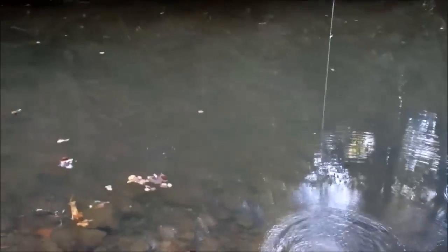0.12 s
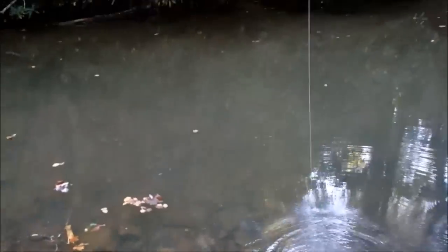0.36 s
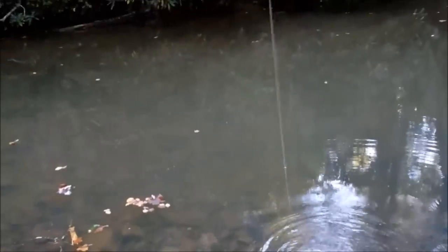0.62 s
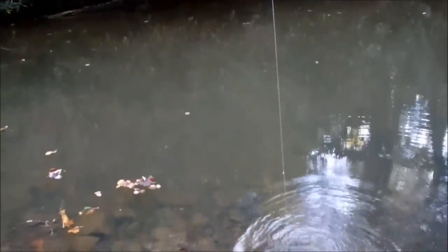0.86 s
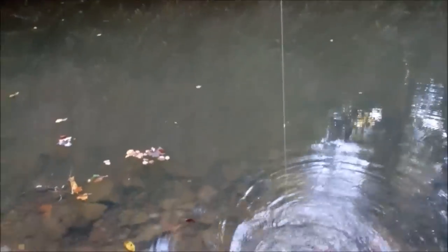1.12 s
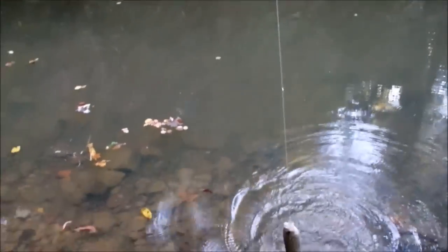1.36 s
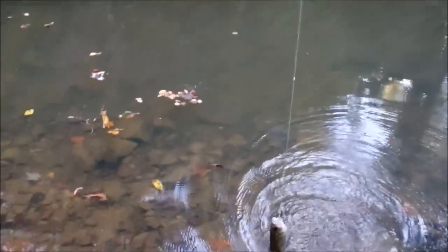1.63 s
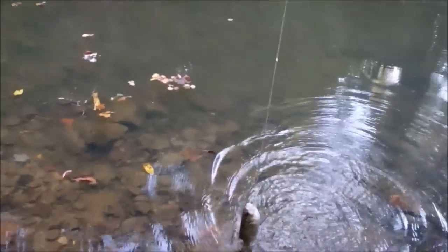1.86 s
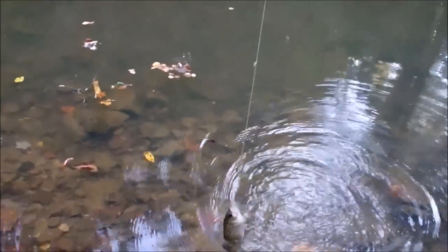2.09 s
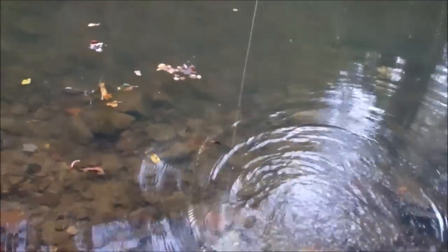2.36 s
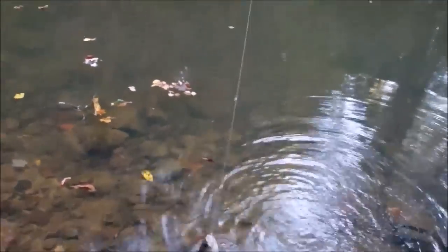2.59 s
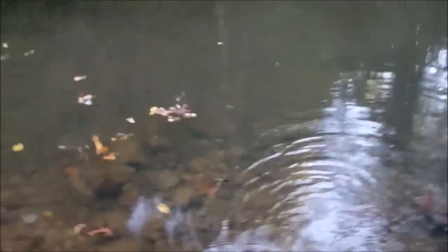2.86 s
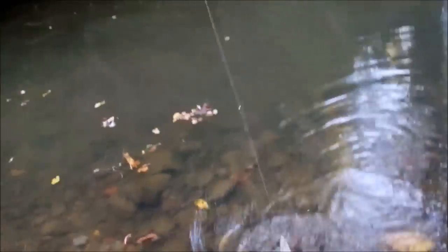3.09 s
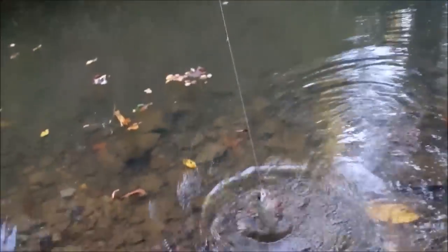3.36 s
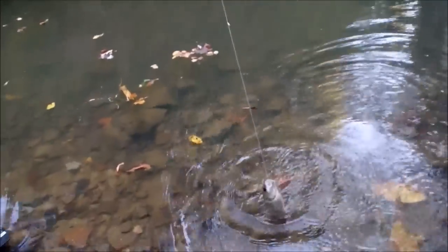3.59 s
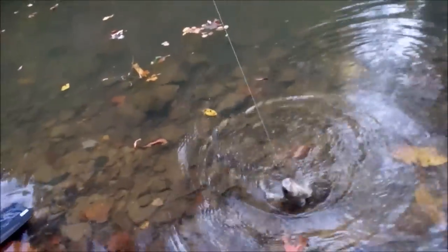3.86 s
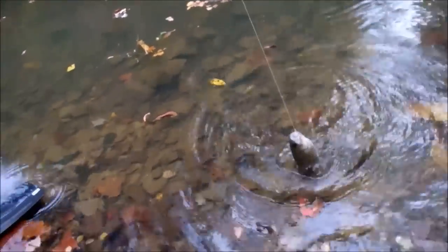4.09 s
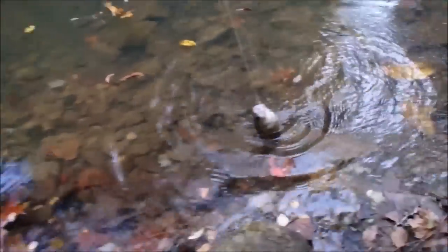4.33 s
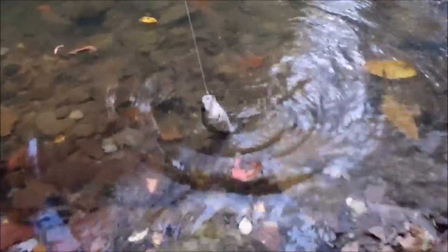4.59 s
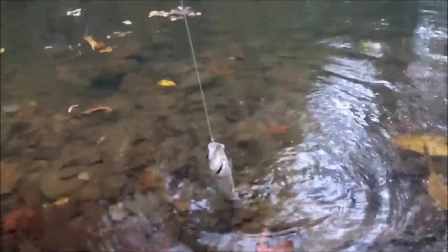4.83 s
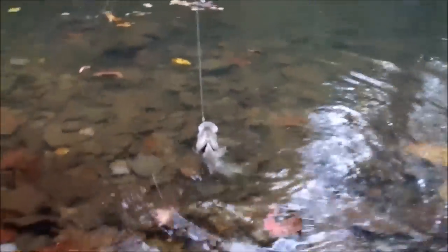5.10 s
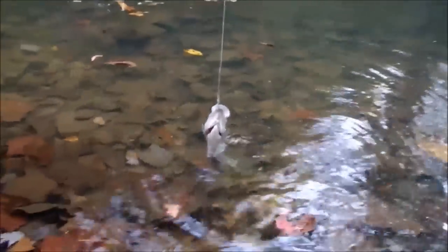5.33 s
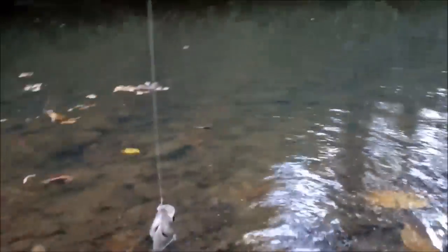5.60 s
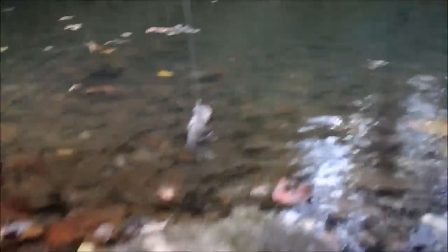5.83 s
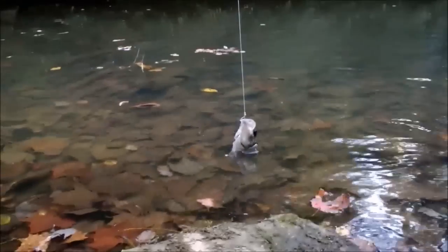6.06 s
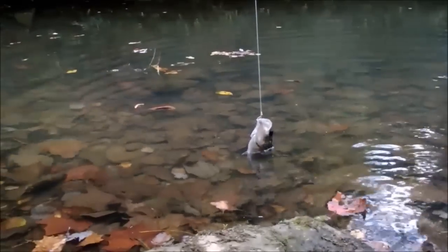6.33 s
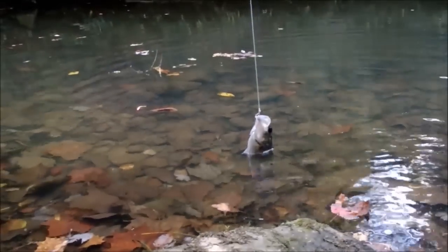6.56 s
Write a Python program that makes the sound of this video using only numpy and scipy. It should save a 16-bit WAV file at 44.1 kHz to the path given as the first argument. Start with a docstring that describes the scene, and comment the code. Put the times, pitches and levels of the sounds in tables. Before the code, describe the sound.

Close handheld stereo pickup at a woodland stream: scattered ringing water drops and fine spray from a thrashing little fish, over low steady hush and hiss. Tiny lens clicks run in uneven groups on a quick beat, and cricket chirps appear briefly. Dull plastic knocks and scrapes interrupt around three seconds, then cluster heavily with wet slaps just before six, after which the sound drops sharply to very faint ambience and tiny ticks.

```python
"""Small fish on a line at a woodland stream

A hooked fish slaps and drips at the water's edge: drops are ringing bubbles, slaps and spray are bursts of grains.
Cricket trills are rows of short tones, over shaped noise for the stream, a faint insect chorus and hiss.
The lens drive ticks on a beat, and a hand knocks and rubs the camera body, heard as short noises ringing its modes.
The handling is hardest near the end, after which the level of everything drops sharply, ticks included.
"""
import sys
import numpy as np
from scipy import signal
from scipy.io import wavfile
from scipy.ndimage import uniform_filter1d

SR = 44100
rng = np.random.default_rng(int(sys.argv[2]) if len(sys.argv) > 2 else 0)


def amplitude_ratio(level_db):
    """Convert a level in decibels to the matching linear amplitude (field) ratio."""
    exponent = np.asarray(level_db, float) / 20
    return 10 ** exponent


def to_wav(sig):
    """Store sig (one row per channel, or 1-D mono) as 16-bit WAV at the path in sys.argv[1].

    Samples outside -1..1 are clipped; the rate is SR.
    """
    pcm = np.clip(np.atleast_2d(sig), -1, 1) * 32767
    pcm = np.round(pcm).astype(np.int16)
    wavfile.write(sys.argv[1], SR, pcm.T)  # frames by channels


N = 295273  # length in samples


def evened(x):
    """Scales a sound to an rms of 1."""
    return x / np.sqrt(np.mean(x ** 2) + 1e-20)


def peaked(x):
    """Scales a sound to a peak of 1."""
    return x / abs(x).max()


def read(points, hz):
    """Reads a curve of (Hz, value) points, with straight lines on a log frequency scale."""
    f, value = np.transpose(points)
    return np.interp(np.log(hz + 1), np.log(f + 1), value)


def band(x, low_hz, high_hz):
    """Keeps the sound between two frequencies."""
    return signal.sosfilt(signal.butter(2, [low_hz, high_hz], "bandpass", fs=SR, output="sos"), x)


def sides(pan_db):
    """Left and right gains that differ by pan_db."""
    return amplitude_ratio(np.array([pan_db / 2, -pan_db / 2]))


def add(mix, s, sound, pan_db):
    """Adds a one-channel sound to the stereo mix at s seconds."""
    part = mix[:, max(round(s * SR), 0):][:, :len(sound)]
    part += np.outer(sides(pan_db), sound[:part.shape[1]])


def ringing(modes, detune=0):
    """A struck body rings as a sum of fading sines; detune is the random spread of their pitches."""
    t = np.arange(6000) / SR
    out = np.zeros(len(t))
    for hz, db, t60 in modes:
        pitch_hz = hz * (1 + detune * rng.standard_normal())
        out += amplitude_ratio(db - 60 * t / t60) * np.sin(2 * np.pi * pitch_hz * t)
    return out


def shaped(rows):
    """Rows (start, end, dB, rise s over 30 dB, t60, ..) add in power; further columns follow the loudest row."""
    t = np.arange(0, N + 32, 32) / SR
    start, end, db, rise, t60, *more = np.transpose(rows)[:, :, None]
    below_db = 30 * np.maximum(start - t, 0) / rise + 60 * np.maximum(t - end, 0) / t60
    power = amplitude_ratio(db - np.minimum(below_db, 200)) ** 2
    total = power.sum(0)
    curves = [np.sqrt(total)] + [(power * m).sum(0) / total for m in more]
    return [np.interp(np.arange(N) / SR, t, curve) for curve in curves]


# Colour of the stream, the insect chorus near 5 kHz and the microphone hiss.
# Each row: frequency in Hz, relative level in dB per Hz.
AIR_COLOUR = [(24, -48), (40, -28.5), (108, -10.5), (154, -14), (235, -16.5), (350, -13.5), (449, -14.5),
              (740, -10.5), (926, -11.5), (2110, -15), (2840, -13.5), (4000, -12), (4350, -14),
              (4900, -5.5), (5500, -15), (8000, -19.5), (15500, -22)]
# How alike left and right are. Each row: frequency in Hz, likeness from 0 to 1.
AIR_LIKENESS = [(60, 0.99), (240, 0.49), (950, 0.65), (3770, 0.24), (15000, 0.044)]
# Recorded level of the background over time, with a sharp fall in recording level around 6 s.
# Each row: time in seconds, level in dB.
AIR_LEVEL = [(0, -56), (5.3, -58), (5.6, -57.5), (5.899, -51), (6.17, -80), (6.22, -74), (6.301, -73.5),
             (6.7, -72)]


def surroundings():
    """Stream, chorus and hiss are noise built from random short-time spectra with faint drifting patches."""
    frames, hz = N // 256 + 5, np.fft.rfftfreq(1024, 1 / SR)
    a, b, c, d, patches = rng.standard_normal((frames, 513, 5)).T
    patches = uniform_filter1d(patches, size=14, axis=0)  # smooth over frequency
    patches = evened(uniform_filter1d(patches, size=8, axis=1))  # and over time
    same = np.clip(read(AIR_LIKENESS, hz), -1, 1)[:, None]
    left = a + 1j * b
    right = same * left + np.sqrt(1 - same ** 2) * (c + 1j * d)
    spectra = np.array([left, right]) * amplitude_ratio(read(AIR_COLOUR, hz)[:, None] + 1.5 * patches)
    noise = signal.istft(spectra, nperseg=1024, noverlap=768)[1][:, :N]
    level_db = np.interp(np.arange(N) / SR, *np.transpose(AIR_LEVEL))
    return amplitude_ratio(level_db) * evened(noise)


# Cricket trills. Each row: start in seconds, end in seconds, pitch in Hz, wing strokes a second,
# level in dB, left over right in dB.
TRILLS = [(0, 0.17, 4170, 35, -68, -3), (1.563, 1.87, 4072, 40.3, -60, -11.5),
          (1.723, 1.85, 2870, 40, -67, 0), (1.889, 2.18, 2890, 15.6, -70, 0),
          (2.6, 2.718, 4120, 40, -69, -3), (3.516, 3.84, 4065, 40.3, -59, -2),
          (6.503, 6.62, 3230, 31, -84, -3)]
STROKE_S = 0.0177


def crickets():
    """Each wing stroke is a short pure tone of falling pitch, at a steady rate, with a faint tone between strokes."""
    out = np.zeros((2, N))
    for start, end, hz, rate, db, pan_db in TRILLS:
        t = np.arange(round((end - start) * SR)) / SR
        stroke = np.clip(t % (1 / rate) / STROKE_S, 0, 1)  # progress through the stroke
        gate = 0.061 + np.sin(np.pi * stroke) ** 0.38
        size = amplitude_ratio(1.2 * rng.standard_normal(40))[(t * rate).astype(int)]  # each stroke has its own loudness
        pitch_hz = hz * (1 - 0.0112 * (stroke - 0.5))
        tone = np.sin(2 * np.pi * np.cumsum(pitch_hz) / SR)
        trill = evened(gate * size * tone) * signal.windows.tukey(len(t), 0.15)
        add(out, start, amplitude_ratio(db) * trill, pan_db)
    return out


# Ticks of the lens drive, mostly on a beat of 7.5 a second. Each row: time in seconds, peak level in dB.
TICKS = [(0.0862, -30), (0.2203, -31.5), (0.3534, -35.5), (0.4874, -41), (1.1546, -36.5), (1.288, -34.5),
         (1.4204, -37.5), (1.555, -33), (1.6885, -33), (1.8215, -37), (1.9556, -36), (2.088, -40),
         (2.7214, -34.5), (2.758, -43), (3.157, -35), (3.2894, -31), (3.3557, -41.5), (3.4226, -28.5),
         (3.6906, -36), (3.825, -40.5), (3.957, -34.5), (4.4904, -32.5), (4.7562, -41), (5.158, -30.5),
         (5.3582, -40), (5.4247, -59), (5.56, -39), (6.3588, -65), (6.4923, -53.5), (6.6273, -57.5)]
# Ringing of the plastic around the lens. Each row: pitch in Hz, relative level in dB,
# time to fade by 60 dB in seconds.
LENS_MODES = [(1160, -11.5, 0.0092), (1758, 0.5, 0.021), (2240, 2.5, 0.013), (2606, -0.5, 0.021),
              (3080, -4.5, 0.014), (3650, -10, 0.02)]


def lens():
    """Each tick is one sharp step and a short burst of noise that ring the plastic around the lens."""
    out = np.zeros((2, N))
    for s, db in TICKS:
        steps = rng.standard_normal(130) * np.exp(-np.arange(130) / 45) * 0.17
        steps[0] = 1
        tick = np.convolve(steps, ringing(LENS_MODES, 0.0061)[:2000])
        add(out, s, amplitude_ratio(db) * peaked(band(tick, 1200, 10000)), 0.6)
    return out


# Knocks on the camera body. Each row: time in seconds, peak level of the thud in dB before the last filters,
# brightness (crack over thud) in dB, level of the scrape that follows in dB, left over right in dB.
KNOCKS = [(2.785, -39, -8, -57, 2), (2.925, -33, -3, -45, 2), (2.929, -21.5, -21, -40, 1.5),
          (2.982, -23, -17, -41, 4.5), (2.991, -30.5, -12, -34.5, -1), (3.482, -36, -12, -36, 1),
          (3.492, -34.5, -3, -38.5, 4.5), (4.858, -43.5, -2, -54, 1), (4.949, -23.5, -3.5, -30, -3),
          (4.954, -25, -16, -30, 2.5), (5.278, -29, -9, -60, 6), (5.288, -12, -11.5, -25, 2.5),
          (5.605, -29, -14, -30, 1.5), (5.694, -28, -8, -44, 2.5), (5.785, -21, -10.5, -37, -1.5),
          (5.826, -16, -9, -40.5, 2.5), (5.868, -14, -16, -42.5, 2), (5.888, -20.5, -8.5, -33.5, -1),
          (5.908, -22.5, -10.5, -32.5, 4.5), (5.927, -12, -6.5, -21, 2), (5.96, -24.5, -15, -36.5, -0.5),
          (6.078, -10.5, -11, -45.5, 1.5), (6.099, -29, -16, -52.5, -11), (6.111, -26, 1, -30, 1.5)]
# Ringing of the camera body. Each row: pitch in Hz, relative level in dB, time to fade by 60 dB in seconds.
BODY_MODES = [(230, -16.5, 0.043), (344, -2.5, 0.037), (384.3, -1, 0.054), (489.6, 4.5, 0.046),
              (617, -2, 0.026), (660, -3, 0.066), (784, 3, 0.034), (941, -8, 0.14), (1056, -16.5, 0.017)]
# The hand rubbing the body. Each row: start in seconds, end in seconds, level in dB before the last filters,
# left over right in dB.
RUBS = [(.12, 0.17, -60, 1.5), (0.952, 1.01, -63, -1), (1.185, 1.28, -57.5, 3), (1.408, 1.424, -59.5, 0),
        (1.504, 1.53, -65.5, -4), (2.38, 2.617, -68.5, -4), (2.683, 2.78, -62.5, 3),
        (2.794, 2.907, -56.5, 1.5), (2.995, 3.017, -57, 1), (3.517, 3.53, -53.5, 1),
        (3.563, 3.715, -56.5, 1.5), (4.443, 4.806, -69.5, 2), (4.982, 5.065, -57.5, 1),
        (5.307, 5.366, -51.5, 1.5), (5.687, 5.934, -45, 1.5), (5.97, 6.003, -43.5, 1.5),
        (6.023, 6.066, -49.5, 2), (6.126, 6.167, -45.5, 1.5), (6.22, 6.284, -61, 2)]
# The whole camera bouncing in the grip. Each row: start in seconds, end in seconds, level in dB.
BOUNCES = [(0, 0.026, -55.5), (1.25, 1.287, -73), (1.52, 1.553, -71), (2.72, 2.73, -60.5),
           (2.785, 2.876, -63), (2.928, 2.963, -46), (2.993, 3.056, -47), (3.496, 3.521, -46),
           (3.62, 3.703, -69), (4.94, 5.017, -56), (5.283, 5.32, -47.5), (5.365, 5.356, -43),
           (5.492, 5.517, -64), (5.62, 5.65, -59), (5.693, 5.8, -46), (5.82, 5.854, -32.5),
           (5.893, 5.96, -41), (6.1, 6.13, -40.5)]
# Rises are the seconds taken for the last 30 dB; t60 is the seconds taken to fade by 60 dB.
RATTLE_S, SCRAPE_RISE_S, SCRAPE_T60 = 0.0079, 0.004, 0.11
RUB_RISE_S, RUB_T60 = 0.04, 0.12
BOUNCE_HZ, BOUNCE_RISE_S, BOUNCE_T60 = 90.5, 0.02, 0.18


def handling():
    """Knocks are short rattles and rubbing is lumpy noise, both ringing the body; the grip adds a low bounce."""
    out = np.zeros((2, N))
    u = np.arange(round(4 * RATTLE_S * SR)) / (RATTLE_S * SR)  # time in units of RATTLE_S
    for s, db, bright_db, _, pan_db in KNOCKS:
        rattle = rng.standard_normal(len(u)) * np.exp(-u * 2.03) * np.minimum(u * 9, 1)
        thud = peaked(np.convolve(rattle, ringing(BODY_MODES, 0.038)))
        crack = peaked(np.convolve(rattle, ringing(LENS_MODES, 0.034)))
        add(out, s, amplitude_ratio(db) * (thud + amplitude_ratio(bright_db) * crack), pan_db)

    scrapes = [(s, s, db, SCRAPE_RISE_S, SCRAPE_T60, pan_db) for s, _, _, db, pan_db in KNOCKS]
    rubs = [(a, b, db, RUB_RISE_S, RUB_T60, pan_db) for a, b, db, pan_db in RUBS]
    level, pan_db = shaped(scrapes + rubs)
    lump_db = 2.8 * evened(uniform_filter1d(rng.standard_normal(N), size=500))
    lumps = amplitude_ratio(lump_db) * rng.standard_normal(N)
    rub = evened(signal.oaconvolve(lumps, ringing(BODY_MODES))[:N])
    rub = rub + 0.5 * evened(band(lumps, 230, 970))
    out += level * sides(pan_db) * evened(rub)

    level, = shaped([(a, b, db, BOUNCE_RISE_S, BOUNCE_T60) for a, b, db in BOUNCES])
    hum = np.sqrt(2) * np.sin(2 * np.pi * BOUNCE_HZ * np.arange(N) / SR)
    rumble = rng.standard_normal(N) + 0.55 * rng.standard_normal((2, N))  # shared noise plus some for each side
    bounce = hum + 0.52 * evened(band(rumble, 56, 200))
    return band(band(out, 225, 12000), 190.6, 16000) + level * bounce


# Tail slaps, each a short throw of spray. Each row: time in seconds, level in dB,
# treble relative to that in dB, left over right in dB.
SLAPS = [(.266, -56, -27, -4), (0.771, -46.5, -5, 0), (0.859, -47, -9.5, 0), (1.022, -48, 2.5, 4.5),
         (.884, -53.5, 3.5, 10), (1.01, -42.5, -11.5, -1), (2.402, -47, -33, 2), (2.502, -52, -6.5, 22),
         (2.578, -44.5, -17, -3), (2.889, -44.5, -33, -2), (2.929, -48, -22, 16.5), (2.99, -35.5, -10.5, 1),
         (3.492, -42, -25, -7), (4.213, -35, -34.5, -2.5), (4.822, -48.5, -29, 0), (4.952, -39, -10.5, 0.5),
         (4.994, -49, -25, -2.5), (5.083, -40.5, -28, -5), (5.29, -27, -22, -3), (5.427, -44, -31.5, 4),
         (5.577, -26.5, -37, -1), (5.781, -29.5, -18.5, 0), (5.934, -33, -13, -3), (6.083, -37.5, -5, 3.5),
         (6.1, -29, -6.5, -4.5), (6.112, -39.5, -12.5, 1), (6.146, -47.5, -3.5, -0.5),
         (6.166, -65.5, 1, -2)]
# Spray falling back while the fish thrashes. Each row: start in seconds, end in seconds, level of the grains in dB,
# treble relative to that in dB, left over right in dB.
SPRAYS = [(0.292, .38, -70, -12.5, -6), (0.613, 0.674, -63, 0, -2.5), (0.76, .81, -58, -7, 0.5),
          (0.85, 0.914, -56.5, -1, 0), (0.95, 1.055, -57, -17.5, -3), (2.381, 2.58, -54, -9, 0.5),
          (2.746, 2.87, -61, -14, -2), (2.967, 3.168, -57.5, -6, 1.5), (4.241, 4.3, -55.5, -12.5, -2),
          (4.465, 4.57, -49, -19, -1), (4.582, 4.687, -46.5, -9, -0.5), (4.71, 4.928, -50, -10.5, -0.5),
          (4.993, 5.03, -49.5, -10, -1), (5.072, 5.223, -52.5, -13.5, -1), (5.317, 5.333, -50, -30.5, -3),
          (5.66, 5.705, -59, -16.5, 0), (5.733, 5.801, -38.5, -18, -1.5), (5.851, 5.923, -39, -19, -2),
          (5.959, 6.12, -47, -14.5, 0), (6.116, 6.255, -65, -13.5, -2)]
# Colour of the spatter. Each row: frequency in Hz, relative level in dB per Hz.
WET_COLOUR = [(410, -48), (700, -30), (900, -16.5), (1300, -13.5), (1790, -11), (2400, -6), (2850, -8),
              (3350, -3), (3850, -9), (4200, -26.5), (5980, -51)]
SLAP_RISE_S, SLAP_T60 = 0.002, 0.04
SPRAY_RISE_S, SPRAY_T60 = 0.03, 0.1
DENSE_DB = -46  # spray above this level merges into an even wash
GRAIN_SPREAD_DB = 3.2  # a few drops of spray are much larger than the rest


def spatter():
    """Spray is many tiny ringing grains over a fine wash; a slap is one dense burst; a fizz of clicks lies above."""
    slaps = [(s, s, db, SLAP_RISE_S, SLAP_T60, *more) for s, db, *more in SLAPS]
    slap, slap_treble_db, slap_pan_db = shaped(slaps)
    sprays = [(a, b, db, SPRAY_RISE_S, SPRAY_T60, *more) for a, b, db, *more in SPRAYS]
    spray, treble_db, pan_db = shaped(sprays)

    t = np.arange(500) / SR
    grains, wash = np.zeros((2, N)), np.zeros((2, N))
    mixing = np.array([[1, 0.12], [1, -0.15]])  # left and right are nearly alike
    for hz in np.geomspace(800, 4300, num=24):
        sizes = amplitude_ratio(GRAIN_SPREAD_DB * np.minimum(rng.exponential(1, (2, N)), 4))
        hits = sizes * (rng.random((2, N)) < 90 / SR)  # about 90 a second
        grain = np.sin(2 * np.pi * hz * t * (1 + 8 * t)) * np.exp(-t * hz / 5.7)
        grain = grain * hz * amplitude_ratio(read(WET_COLOUR, hz))
        causes = np.vstack([mixing @ hits, mixing @ rng.standard_normal((2, N))])
        both = signal.oaconvolve(causes, grain[None], axes=1)
        grains += both[:2, :N]
        wash += both[2:, :N]
    grains, wash = evened(grains), evened(wash)

    hiss = evened(band(rng.standard_normal((2, N)), 3500, 9700))
    clicks = amplitude_ratio(2.8 * np.minimum(rng.exponential(1, N), 4)) * (rng.random(N) < 500 / SR)
    fizz = evened(uniform_filter1d(clicks, size=40) * hiss)
    dense = spray / (spray + amplitude_ratio(DENSE_DB))
    spray_sound = grains + 0.8 * dense * wash + amplitude_ratio(treble_db) * fizz
    slap_sound = wash + amplitude_ratio(slap_treble_db) * hiss
    return spray * sides(pan_db) * spray_sound + slap * sides(slap_pan_db) * slap_sound


# Drops and bubbles. Each row: time in seconds, peak level in dB, starting pitch in Hz, left over right in dB.
DROPS = [(0.2483, -47, 1300, 1), (0.263, -28, 2260, -1), (0.2755, -32, 3280, -1.5),
         (0.3032, -37.5, 2170, 0), (0.3094, -40.5, 1100, -2), (0.321, -41.5, 1370, 0),
         (0.666, -40.5, 2880, -2), (0.7437, -34.5, 3430, -1), (0.7707, -35.5, 3300, -2),
         (.771, -32.5, 4730, 4), (.778, -37.5, 5230, 4), (.787, -41, 3100, 0), (.796, -43, 1930, 2.5),
         (0.797, -39, 3660, 2), (0.8574, -34, 3720, -2), (0.8742, -37.5, 1720, -2), (0.8804, -31, 2260, 1),
         (0.8961, -29, 3240, 0), (.9627, -46, 3050, 0), (0.9766, -29.5, 1387, -0.5), (.995, -44, 2800, 0),
         (1.009, -30, 1970, 0), (1.0139, -31, 1636, 1), (1.0334, -41, 2270, -1.5), (1.103, -44, 3050, -2),
         (2.384, -42.5, 1380, 0), (2.4009, -30.5, 2850, 0), (2.4075, -27.5, 2110, -1),
         (2.448, -35, 3040, 1), (2.4943, -29, 3460, 0), (2.4748, -41, 3340, 7), (2.5068, -36.5, 3250, -3),
         (2.5821, -30, 3280, 1), (2.8883, -28, 3330, 1), (3.009, -38, 2140, -3), (3.0605, -41.5, 2530, -8),
         (3.0762, -28, 2270, -1), (3.127, -39.5, 3160, -2), (4.2137, -33, 1180, -2), (4.252, -44, 1570, 0),
         (4.2887, -42, 1550, 0), (4.5235, -30, 3370, 1), (4.56, -37, 1130, -1), (4.611, -33.5, 2660, -2.5),
         (4.678, -31, 3430, -3), (4.707, -34, 3650, 3), (4.7165, -30.5, 3370, -3.5), (4.82, -25, 3450, 0),
         (4.824, -25.5, 3200, -3), (4.9216, -36.5, 3500, -5), (4.9605, -31, 3260, 0.5),
         (4.9933, -40, 3320, 2), (5.016, -39.5, 3380, 5), (5.086, -30, 3300, 1), (5.1157, -27.5, 3300, -1),
         (5.4283, -44.5, 3480, -23), (5.5766, -23.5, 3220, -4), (5.7306, -32, 2390, -1),
         (5.7839, -18, 2450, 8)]
# Larger air pockets closing under the fish. Each row: time in seconds, peak level in dB, starting pitch in Hz,
# time to fade by 60 dB in seconds, rise in octaves over that time (below 0 falls), left over right in dB.
GULPS = [(.67, -48.5, 2140, .05, -1, -2), (.876, -40.5, 1670, 0.066, 1, 0), (2.397, -44, 570, 0.053, 2, 2),
         (2.441, -45, 443, 0.049, .2, 0), (2.47, -49.5, 556, 0.12, .4, -2),
         (2.482, -44.5, 1030, 0.13, 3, -2), (2.508, -51, 773, .22, 10, 0),
         (2.556, -46.5, 520, 0.07, 0.5, 8), (2.585, -54, 1050, 0.21, 4.5, -2)]
DROP_T60, DROP_RISE = 0.019, 0.25  # ring of a 2 kHz bubble in s (larger ones ring longer), rise in octaves


def drops():
    """A drop clicks as it lands, then the trapped bubble rings, nearly always with a rising pitch."""
    out, t = np.zeros((2, N)), np.arange(5000) / SR
    small = [(s, db, hz, DROP_T60 * (2000 / hz) ** 0.79, DROP_RISE, pan_db) for s, db, hz, pan_db in DROPS]
    for s, db, hz, t60, rise, pan_db in small + GULPS:
        pitch_hz = hz * 2 ** (rise * np.minimum(t / t60, 1))
        bubble = np.sin(2 * np.pi * np.cumsum(pitch_hz) / SR)
        bubble *= amplitude_ratio(-60 * t / t60) * (1 - np.exp(-t / 0.00024))  # fade and soft start
        click = band(rng.standard_normal(len(t)), 850, 8000) * np.exp(-t / 0.0018)
        drop = band(bubble, hz * 0.4, 11800) + 0.21 * click
        add(out, s, amplitude_ratio(db) * peaked(drop), pan_db)
    return out


def bank(x):
    """Early echoes from stones and water, of random sign and fading, a little later on the right."""
    taps = np.zeros((2, 1800))
    taps[:, 60::45] = rng.choice([-1., 1.], taps[:, 60::45].shape)
    taps[1] = np.roll(taps[1], 17)
    taps *= amplitude_ratio(-60 * np.arange(1800) / SR / 0.17)  # fades by 60 dB in 0.17 s
    return signal.oaconvolve(x, taps / np.linalg.norm(taps[0]), axes=1)[:, :N]


LAG = 2  # samples by which the left side hears first


def scene():
    """Drops and crickets get echoes, spatter and camera noises stay dry, and the surroundings lie beneath."""
    outside = drops() + crickets()
    near = outside + amplitude_ratio(-11) * bank(outside) + spatter() + lens() + handling()
    return np.array([near[0], np.roll(near[1], LAG)]) + surroundings()


def top_cut(x):
    """Nothing passes above the cut-off."""
    return signal.sosfilt(signal.butter(12, 15750, fs=SR, output="sos"), x)


def record(dry):
    """Turns the finished mix into the sound that is saved."""
    return top_cut(dry)


dry = scene()
out = record(dry)
to_wav(out)
```